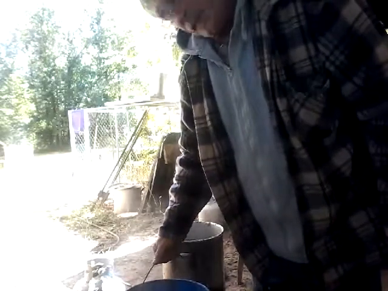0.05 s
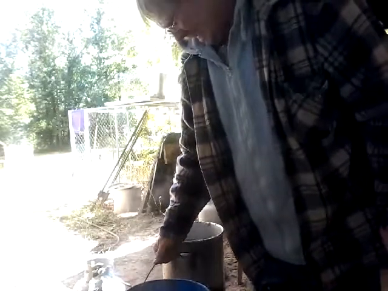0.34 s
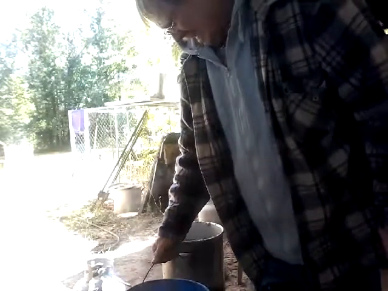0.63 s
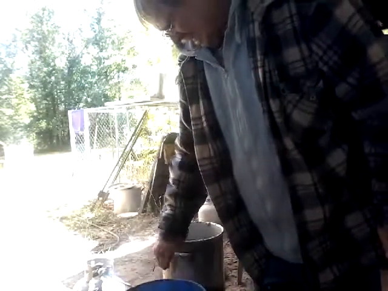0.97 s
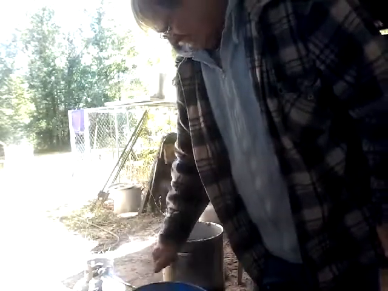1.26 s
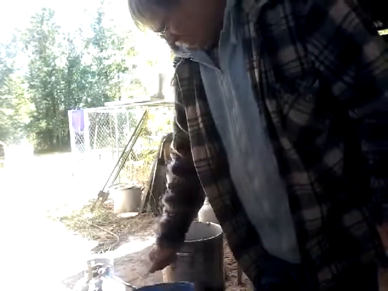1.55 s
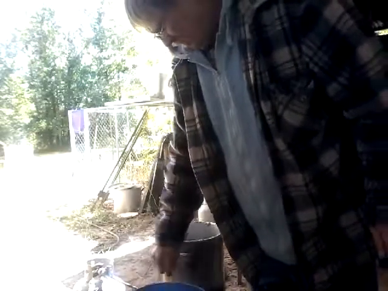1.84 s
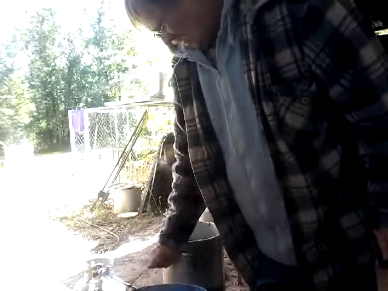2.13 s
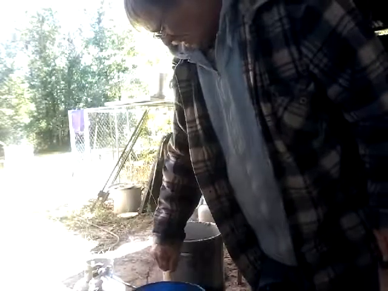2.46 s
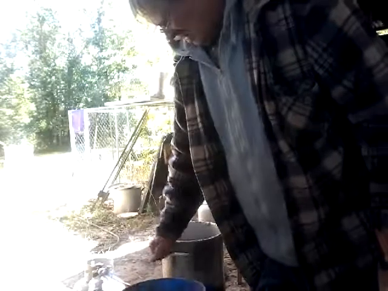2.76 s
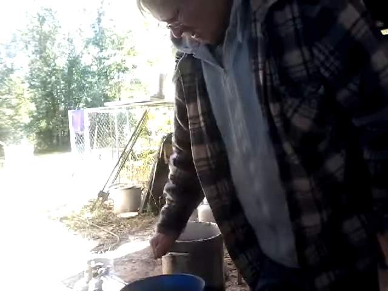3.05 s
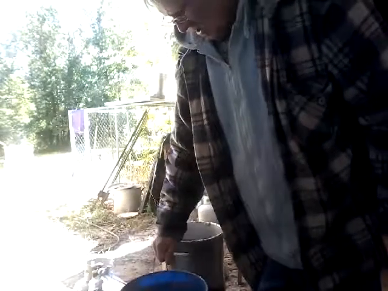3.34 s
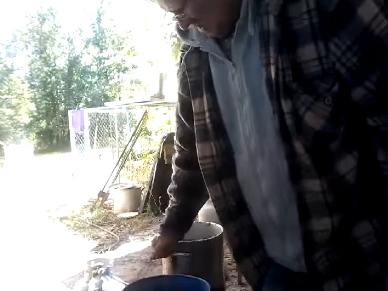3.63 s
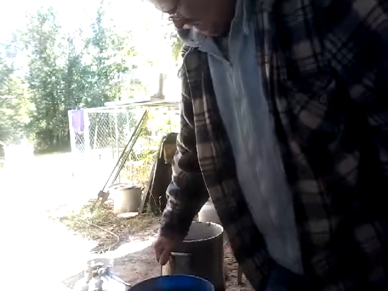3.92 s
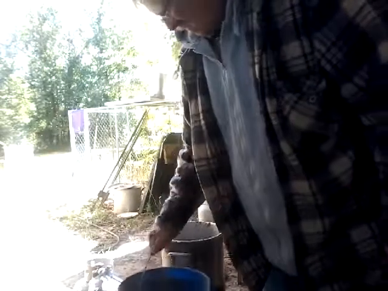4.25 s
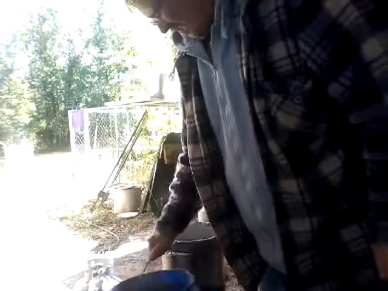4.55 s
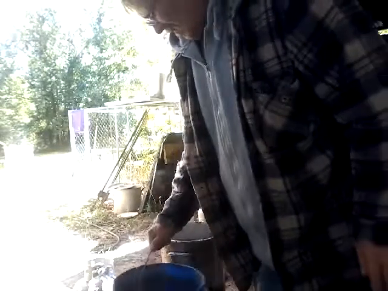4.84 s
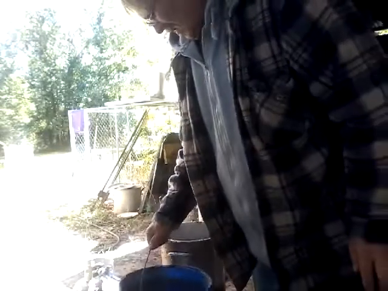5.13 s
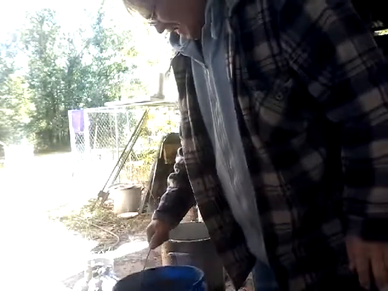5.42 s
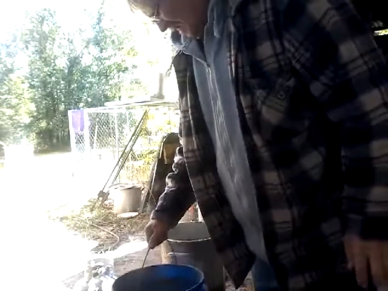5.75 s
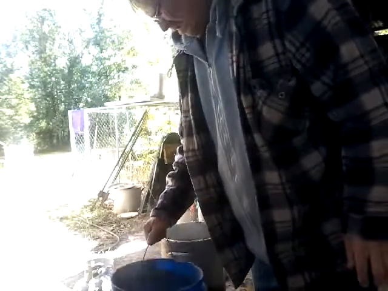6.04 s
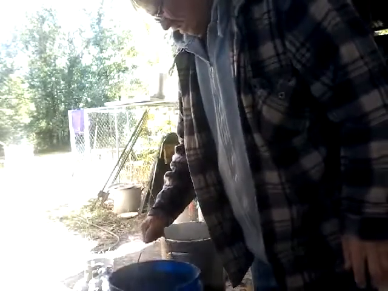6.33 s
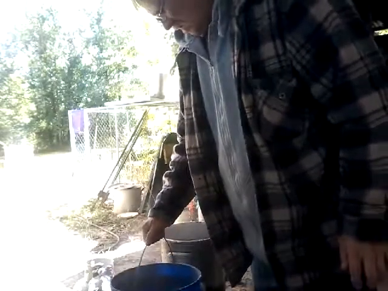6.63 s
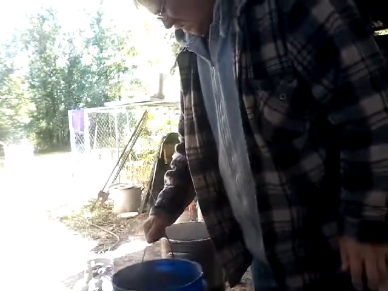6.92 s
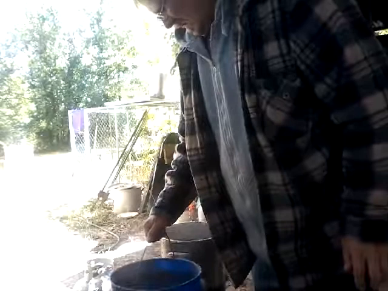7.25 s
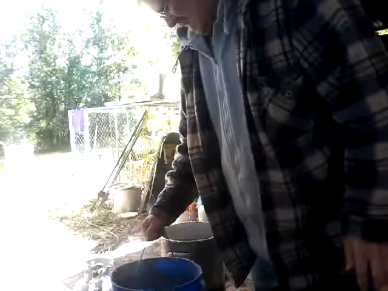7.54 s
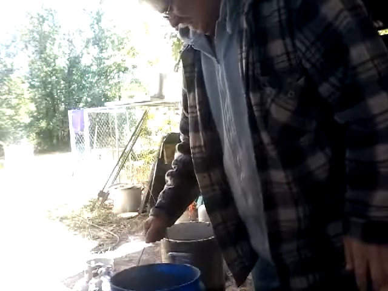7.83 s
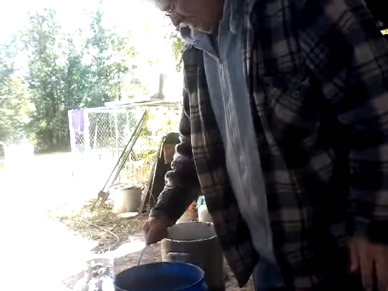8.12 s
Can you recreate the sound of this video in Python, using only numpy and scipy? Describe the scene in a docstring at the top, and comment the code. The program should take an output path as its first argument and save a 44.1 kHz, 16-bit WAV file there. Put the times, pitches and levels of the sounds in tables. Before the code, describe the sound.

In a quiet yard, a nearby plastic bucket is dragged over grit in short, faint pulls with a few dry bumps. After a brief pause, fast rhythmic shaking begins: paired hollow knocks ring its wall, mixed with thin metallic ticks and sharp snaps from the wire handle. The rattle builds, then stops with a last light scrape. A shed roof adds a short echo.

```python
"""A plastic bucket is jiggled by its wire handle, under a shed roof and next to a metal pot.
First it scrapes and scuffs lightly over gritty ground; then a man shakes it about six times a second,
and it knocks twice on each shake. Every bump makes its wall ring, and a fine hiss rides on the knocks.
The wire ticks in its lugs and snaps against its stop. The shed gives a short echo; the yard is quiet."""
import sys
import numpy as np
from scipy import signal
from scipy.fft import rfft, irfft
from scipy.io import wavfile

SR = 44100
rng = np.random.default_rng(int(sys.argv[2]) if len(sys.argv) > 2 else 0)


def wrap_up_sound(samples):
    """Save the sound to the file named by the first command line argument, as 16-bit audio."""
    columns = np.atleast_2d(samples).T
    # keep every value between -1 and 1, then stretch to whole-number steps
    tamed = np.clip(columns, -1, 1)
    steps = np.round(tamed * 32767).astype(np.int16)
    wavfile.write(sys.argv[1], SR, steps)


N = 365103
BUMP_SAMPLES = 16384  # room for one bump and its echo


def amp(db):
    """Turns decibels into a number to multiply by."""
    return 10 ** (np.asarray(db) / 20)


def evened(x):
    """Scales a sound to an average strength (rms) of 1."""
    return x / np.sqrt(np.mean(x ** 2) + 1e-20)


def curve(points, hz):
    """Joins (Hz, value) points with straight lines, giving each octave equal room."""
    point_hz, value = np.transpose(points)
    return np.interp(np.log(hz + 1), np.log(point_hz + 1), value)


def add(mix, start, sound):
    """Mixes a sound in at a start time in seconds."""
    part = mix[max(round(start * SR), 0):][:len(sound)]
    part += sound[:len(part)]


def coloured(x, points):
    """Makes some frequencies louder and others softer, then evens the strength to 1."""
    gain = amp(curve(points, np.fft.rfftfreq(len(x), 1 / SR)))
    return evened(irfft(rfft(x) * gain, len(x)))


def ring_after_strike(gain):
    """Turns a gain for each frequency into a filter that rings only after it is struck."""
    cepstrum = irfft(np.log(np.maximum(gain, 1e-6)))
    cepstrum[1:BUMP_SAMPLES // 2] *= 2
    cepstrum[BUMP_SAMPLES // 2 + 1:] = 0
    return np.exp(rfft(cepstrum))


def drift(per_s):
    """A smooth random wobble, up to about per_s times a second."""
    hz = np.fft.rfftfreq(N, 1 / SR)
    return evened(irfft(rfft(rng.standard_normal(N)) / (1 + (hz / per_s) ** 4), N))


# The tone of the still yard. Each row: frequency in Hz, relative level in dB.
YARD_COLOUR = [(20, -28), (40, -22), (70, -4), (105, -1), (180, -6), (400, -6), (720, -8), (1200, -14),
               (2700, -20), (4100, -18.5), (5800, -26.5), (8000, -26.5), (15800, -24.5)]

def yard(level_db=-66, waver_db=3.0, rumble_hz=170):
    """Steady outdoor air; only its low rumble wavers."""
    air = coloured(rng.standard_normal(N), YARD_COLOUR)
    rumble = irfft(rfft(air) / (1 + (np.fft.rfftfreq(N, 1 / SR) / rumble_hz) ** 4), N)
    return amp(level_db) * (air - rumble + rumble * amp(waver_db * drift(3.0)))


# The tone of the shed's echo. Each row: frequency in Hz, relative level in dB.
SHED_COLOUR = [(100, 5.5), (220, 0), (450, 6.5), (850, -0.5), (2000, -1), (3300, -1.5), (7000, -1.5),
               (15000, 1)]
# How long the echo lasts. Each row: frequency in Hz, seconds to fade by 60 dB.
SHED_FADE = [(100, 0.7), (400, 0.15), (1000, 0.2), (2700, 0.18), (7000, 0.24), (15000, 0.75)]

def shed_echo():
    """The spectrum of the shed's blurred echo: noise whose bands each fade at their own speed."""
    hz, t, bands = signal.stft(rng.standard_normal(BUMP_SAMPLES), SR, nperseg=256)
    fade_s = curve(SHED_FADE, hz)[:, None]
    same_energy = np.sqrt(2 * np.log(1000) / (fade_s * SR))
    bands = bands * amp(curve(SHED_COLOUR, hz)[:, None] - 60 * t / fade_s) * same_energy
    build_up = 1 - np.exp(-(np.arange(BUMP_SAMPLES) / SR / 0.0058) ** 2)
    return rfft(signal.istft(bands, SR, nperseg=256)[1][:BUMP_SAMPLES] * build_up)


# The notes the bucket and handle ring at. Each row: pitch in Hz, width in Hz, strength in dB.
BUCKET_NOTES = [(218.6, 33, 9), (724, 40, -16), (804.6, 20, 4.5), (1018.5, 56, 10), (1220, 19, 0.5),
                (1398, 70, 3.5), (1690, 40, -2.5), (1762, 48, 2.5), (2570, 100, -4), (2720, 37, -11),
                (3380, 19, -9), (3700, 110, -1.5), (3750, 41, -10)]

def wall_gain(hz):
    """The bucket's wall passes every frequency but boosts its own notes."""
    peaks = sum(amp(db) ** 2 / (1 + (2 * (hz - pitch) / width) ** 2) for pitch, width, db in BUCKET_NOTES)
    return np.sqrt(1 + peaks)


# Pulls of the bucket over the ground. Each row: start in seconds, length in seconds, relative level in dB.
PULLS = [(0.93, 0.35, -63.5), (1.258, 0.16, -59), (1.413, 0.14, -59), (1.54, 0.36, -52),
         (2.07, 0.27, -63.5), (2.263, 0.086, -64.5), (2.35, 0.27, -63.5), (2.825, 0.15, -61.5),
         (3.1, 0.31, -68.5), (5.08, 0.23, -68), (5.28, 0.15, -62.5), (7.95, 0.47, -69.5)]
# The tone of the scraping. Each row: frequency in Hz, relative level in dB.
GRIT_COLOUR = [(40, -35), (110, -1), (400, -3), (600, 4), (950, -3), (1800, 1.5), (2600, -6), (4300, -7),
               (7000, -18.5), (15000, -21)]

def scrape(level_db=-1, grains_per_s=1800, grain_db=3.0, uneven_db=1.5, peak_share=0.45):
    """Grit catches and slips under the bucket and rings its wall; each pull swells and eases off."""
    pressure = np.zeros(N)
    for start, length, db in PULLS:
        progress = np.interp(np.arange(0, length, 1 / SR) / length, [0, peak_share, 1], [0, .5, 1])
        add(pressure, start, amp(db) * abs(np.sin(np.pi * progress)) ** 0.59)
    catches = rng.random(N) < grains_per_s / SR
    grains = catches * amp(grain_db * np.minimum(rng.exponential(1, N), 4))
    rub = evened(grains * rng.choice([-1, 1], N)) + rng.standard_normal(N)
    wall = irfft(ring_after_strike(wall_gain(np.fft.rfftfreq(BUMP_SAMPLES, 1 / SR))))
    ringing = signal.oaconvolve(rub * amp(uneven_db * drift(48)), wall)[:N]
    return amp(level_db) * pressure * coloured(ringing, GRIT_COLOUR)


# Ticks of the wire handle. Each row: start in seconds, relative level in dB, pitch in Hz.
HANDLE_TICKS = [(2.55, -60, 3200), (3.0609, -60, 3960), (3.4472, -51.5, 3320), (5.093, -51.5, 3480),
                (5.7286, -49, 3500), (5.748, -47, 3970), (6.4632, -40, 2410), (6.922, -40.5, 3540),
                (7.4676, -36.5, 2700), (8.2116, -55, 2340)]

def handle_ticks(level_db=-4, fade_s=0.058, width_hz=750, click_db=-18):
    """The wire rasps in the lugs that hold it: a short burst of noise around one pitch."""
    t, hz, out = np.arange(4096) / SR, np.fft.rfftfreq(4096, 1 / SR), np.zeros(N)
    click = amp(click_db) / (1 + (hz / 6000) ** 2)
    attack = 1 - np.exp(-t / 0.00091)
    for start, db, pitch in HANDLE_TICKS:
        band = 1 / (1 + (2 * (hz - pitch) / width_hz) ** 2)
        rasp = evened(irfft(rfft(rng.standard_normal(len(t))) * (band + click)))
        add(out, start, amp(db + level_db - 60 * t / fade_s) * attack * rasp)
    return out


# Sharp snaps of the handle. Each row: start in seconds, relative level in dB.
HANDLE_SNAPS = [(1.8364, -41), (2.361, -47), (4.756, -41), (5.611, -38), (5.7807, -43), (6.2964, -31),
                (6.6293, -30), (6.6942, -37), (7.144, -35), (7.319, -35), (7.5562, -42)]
# The tone of a snap. Each row: frequency in Hz, relative level in dB.
METAL_COLOUR = [(2500, -29), (5500, -5), (7400, 2), (8500, -2), (9700, -29), (13000, -16), (15500, -4)]

def handle_snaps(level_db=-3, crack_s=0.0011, ring_db=-11, ring_s=0.011):
    """The wire jerks against its stop: a high crack and a brief ring."""
    t, out = np.arange(4096) / SR, np.zeros(N)
    attack = 1 - np.exp(-t / 0.00048)
    fade = np.exp(-t / crack_s) + amp(ring_db) * np.exp(-t / ring_s)
    for start, db in HANDLE_SNAPS:
        noise = coloured(rng.standard_normal(len(t)), METAL_COLOUR)
        add(out, start, amp(db + level_db) * attack * fade * noise)
    return out


def contact(rise, slide_db, clean_s=0.00083, slide_s=0.0053, settle_s=0.017, settle_db=-14):
    """One bump's lead-in time and force spectrum: a clean blow if quick, a chatter of tiny ones if slow."""
    lead = 1536 / SR
    t, hz = np.arange(BUMP_SAMPLES) / SR - lead, np.fft.rfftfreq(BUMP_SAMPLES, 1 / SR)
    age = np.maximum(t, 0) / rise
    chatter = rng.standard_normal(BUMP_SAMPLES) * age ** 2 * np.exp(-1.5 * age)
    chatter /= np.linalg.norm(chatter)
    # the rim slides in before it lands, and grinds as it settles
    slide = np.exp(-abs(t) / slide_s) * (t < rise)
    settle = np.exp(-abs(t) / settle_s) * (t >= rise)
    grind = amp(slide_db) * slide / np.linalg.norm(slide) + amp(settle_db) * settle / np.linalg.norm(settle)
    clean_share = 1 / (1 + (rise / clean_s) ** 2)
    blow = np.sqrt(clean_share) * np.exp(-2j * np.pi * hz * (lead + rise))
    rough = rfft(np.sqrt(1 - clean_share) * chatter + grind * rng.standard_normal(BUMP_SAMPLES))
    # higher waves cross the bending wall faster; at 1000 Hz they take about 1.2 ms
    travel = np.exp(-2j * np.pi * 2 * 0.001204 * np.sqrt(hz * 1000))
    return lead, (blow + rough) * travel


# Echoes off the ground and the pot. Each row: delay in seconds, level in dB against the direct sound.
CLOSE_ECHOES = [(.0025, -6.5), (.0039, -4), (.0062, -11.5), (.0088, -9.5)]

def bucket(bumps, colour, level_db, shed_db, spot_width=0.24, bass_hz=520, bright_hz=2700, flex=0.0023):
    """Each bump rings the bucket; close echoes and the shed's echo follow."""
    hz, out = np.fft.rfftfreq(BUMP_SAMPLES, 1 / SR), np.zeros(N)
    bass = 1 / (1 + (hz / bass_hz) ** 4)
    treble = 1 - 1 / (1 + (hz / bright_hz) ** 4)
    middle = (1 - bass) * (1 - treble)  # this range sets each bump's level
    colour_db, hardest_db = curve(colour, hz), max(bump[1] for bump in bumps)
    for start, db, bass_db, bright_db, rise, slide_db, spot_hz, spot_db in bumps:
        lead, force = contact(rise, slide_db)
        # the wall flexes, which shifts its notes a little
        wall = wall_gain(hz * (1 + flex * rng.uniform(-0.61, 1)))
        # the spot that is struck favours the notes around one pitch
        spot = spot_db / (1 + (2 * (hz / spot_hz - 1) / spot_width) ** 2)
        body = ring_after_strike(wall * amp(colour_db + spot + bass_db * bass + bright_db * treble))
        # the bucket moves, so the echo paths change a little from bump to bump
        echoes = sum(amp(echo_db) * np.exp(-2j * np.pi * hz * delay * rng.uniform(.93, 1.07))
                     for delay, echo_db in CLOSE_ECHOES)
        near = body * force * (1 + echoes)
        near /= np.linalg.norm(irfft(near * middle))
        tail = body * shed_echo() * np.exp(-2j * np.pi * hz * lead) / np.linalg.norm(irfft(body * middle))
        # hard blows shake the whole bucket and carry further into the shed
        tail *= amp(shed_db + 0.094 * (db - hardest_db))
        add(out, start - lead, amp(db + level_db) * np.sqrt(.014 * SR) * irfft(near + tail))
    return out


# Dry scuffs of the bucket. Each row: start in seconds, relative level in dB, brightness in dB,
# rise time in seconds, pitch of the rubbed spot in Hz.
DRAG_SCUFFS = [(1.1004, -45, -6, 0.0012, 680), (1.128, -49, -7, 0.0029, 1090), (1.182, -56, -4, .0011, 930),
               (1.312, -58.5, 8, .001, 3400), (1.342, -64.5, 4, 0.00093, 4920),
               (1.369, -60.5, 9, 0.00059, 4490), (1.472, -52, -5, 0.00055, 1750),
               (1.555, -55.5, 2, .0016, 1770), (1.611, -53, 3, 0.00078, 1250), (1.656, -48, 0, 0.0017, 650),
               (1.833, -42.5, 5, 0.0041, 3160), (1.866, -51, -18, .0006, 2140),
               (1.982, -51.5, 1, 0.0061, 2590), (2.362, -52, 15.5, 0.00049, 1810),
               (2.407, -61, 6, 0.0012, 3700), (2.419, -58.5, 15, 0.00061, 5100),
               (2.498, -63.5, 7.5, 0.000624, 4460), (3.129, -54, -1, 0.0013, 1120),
               (3.161, -58.5, 0, 0.00036, 1560), (3.241, -51, -5, 0.0023, 1360),
               (3.555, -56.5, 6, .002, 1630), (3.625, -49.5, -0.5, 0.0015, 3300),
               (3.648, -58, 5, .0016, 1530), (6.461, -43.5, 1, 0.0034, 2190), (8.009, -53, 2, 0.0011, 833)]
# The tone of a scuff. Each row: frequency in Hz, relative level in dB.
DRAG_COLOUR = [(40, -12), (110, -0.5), (400, 0.5), (900, -2), (1800, 0.5), (2500, -5), (4200, -10),
               (7000, -21.5), (16000, -28)]

def dragging(bass_db=-3, slide_db=-11, spot_db=7.5):
    """The dragged bucket touches the ground in light, single scuffs."""
    bumps = [(start, db, bass_db, bright_db, rise, slide_db, spot_hz, spot_db)
             for start, db, bright_db, rise, spot_hz in DRAG_SCUFFS]
    return bucket(bumps, DRAG_COLOUR, level_db=-2.0, shed_db=-3.0)


def fizz(knocks, level_db=-45, follow=0.43, flicker_db=1.5, hold_s=0.0059):
    """A fine hiss rides on the knocks and dies more slowly than they do."""
    keep = np.exp(-1 / (hold_s * SR))
    power = signal.lfilter([1 - keep], [1, -keep], knocks ** 2) + 1e-14
    hiss = coloured(rng.standard_normal(N), [(1500, 3), (5000, 12), (9000, 5.5), (12000, 6), (15500, 6.5)])
    return amp(level_db + flicker_db * drift(200)) * hiss * np.sqrt(power) ** follow


def graze(knock_start, spot_hz, early_s=0.0096, db=-56, bass_db=4.5, bright_db=14, rise=0.00144):
    """Describes the light touch of the rim just before a knock."""
    slide_db, spot_db = -13, 4
    return knock_start - early_s, db, bass_db, bright_db, rise, slide_db, spot_hz, spot_db


def knock(start, db, rise, spot_hz, bright_db, spot_db, usual_db=-37.5, usual_rise_s=0.0014):
    """Describes one knock: soft ones sound hollower, slow ones scrape brighter, both slide in further."""
    softer_db = usual_db - db
    slower = np.log2(rise / usual_rise_s)  # each doubling adds 1 dB of brightness
    bass_db = 4.5 + 0.48 * softer_db
    slide_db = -13 + 2.5 * slower + 0.53 * softer_db
    return start, db, bass_db, bright_db + slower, rise, slide_db, spot_hz, spot_db


def bounce(start, db, bass_db, spot_hz, bright_db=0, rise=0.000773, slide_db=-8, spot_db=6):
    """Describes the quick extra bump when the bucket bounces after a knock."""
    return start, db, bass_db, bright_db, rise, slide_db, spot_hz, spot_db


# Shakes of the bucket. Each row: start in seconds, relative brightness in dB; then for the knock on the
# way out: relative level in dB, rise time in seconds, pitch of the struck spot in Hz; then the seconds
# until the knock on the way back, and its level, rise time and pitch.
BUCKET_SHAKES = [(1.702, 5.5, -40, 0.0028, 2920, 0.044, -33, .0017, 800),
                 (4.416, -2.5, -32.5, 0.003, 990, 0.044, -22.5, 0.0023, 1000),
                 (4.57, 0, -42.5, 0.0041, 1070, 0.056, -32, 0.0014, 970),
                 (4.7558, -0.5, -31, 0.00068, 1260, 0.053, -35.5, 0.003, 720),
                 (4.93, -4, -40.5, 0.0017, 1010, .054, -38.5, 0.001, 1410),
                 (5.449, -10, -41.5, 0.00072, 1000, 0.043, -32.5, 0.0018, 1360),
                 (5.611, 1.5, -30.5, 0.00071, 1680, .053, -37.5, 0.0027, 710),
                 (5.7803, -2, -36.5, .0012, 1020, 0.057, -33, 0.00087, 2580),
                 (5.9622, -5.5, -36, 0.0014, 1700, .045, -34, 0.00266, 1330),
                 (6.125, -2.5, -35, 0.0013, 1530, .057, -37.5, 0.0019, 635),
                 (6.2962, 0.5, -26, .0013, 1480, 0.061, -24.5, .0013, 2130),
                 (6.485, -2.5, -37, 0.0019, 776, 0.039, -31.5, .0018, 790),
                 (6.6301, 2.5, -23, 0.0004, 1530, 0.062, -25.5, 0.00063, 2230),
                 (6.792, 1, -32.5, .003, 1390, 0.071, -23, 0.00194, 2330),
                 (6.968, -0.5, -38, 0.0096, 620, 0.064, -31.5, .0024, 1560),
                 (7.144, 1.5, -28, .0013, 1720, 0.066, -25.5, .0017, 2700),
                 (7.319, 0, -25, 0.00134, 1600, .064, -23, .0026, 1050),
                 (7.4957, 1, -32, .0022, 1780, .0579, -22.5, 0.0021, 2000),
                 (7.657, 3.5, -31.5, 0.00147, 1650, .067, -31, 0.0011, 2110),
                 (7.835, 0, -36, 0.0018, 2440, 0.051, -36.5, 0.002, 2740)]
# Bounces. Each row: start in seconds, relative level in dB, bass in dB, pitch of the struck spot in Hz.
BOUNCES = [(4.585, -44.5, 1, 1140), (4.7908, -38.5, 4, 1980), (4.82, -36, 10, 720),
           (5.797, -40.5, -1, 1040), (5.98, -38, 8.5, 1830), (6.139, -38.5, 5, 1610),
           (6.806, -29, .5, 1070), (7.047, -39.5, 13, 800), (7.669, -33, 6, 1180), (7.848, -39.5, 12, 1340)]
# The tone of a knock. Each row: frequency in Hz, relative level in dB.
SHAKE_COLOUR = [(40, -46), (100, -20), (220, -20), (480, -14), (720, -6), (1150, -10), (1700, -5.5),
                (2400, -9.5), (3800, -18.5), (5800, -33), (7200, -34.5), (9300, -47), (16000, -52)]

def shaking():
    """On each shake the bucket grazes, knocks, and knocks again on the way back; sometimes it bounces."""
    bumps = []
    for start, bright_db, db, rise, spot_hz, back_s, back_db, back_rise, back_hz in BUCKET_SHAKES:
        bumps += [graze(start, spot_hz),
                  knock(start, db, rise, spot_hz, bright_db - 3, spot_db=4),
                  knock(start + back_s, back_db, back_rise, back_hz, bright_db - 0.15, spot_db=5)]
    bumps += [bounce(*row) for row in BOUNCES]
    return bucket(bumps, SHAKE_COLOUR, level_db=-2.0, shed_db=-1.0)


def scene():
    """Adds all the sounds together in one channel."""
    knocks, scuffs = shaking(), dragging()
    return (knocks + fizz(knocks) + scuffs + handle_snaps() + handle_ticks() + scrape() + yard())[None]


def record(dry, cutoff_hz=15900):
    """Cuts away the very highest treble."""
    lowpass = signal.firwin(511, cutoff_hz, window=("kaiser", 8), fs=SR)
    return signal.oaconvolve(dry, lowpass[None], "same", axes=1)


dry = scene()
out = record(dry)
wrap_up_sound(out)
```